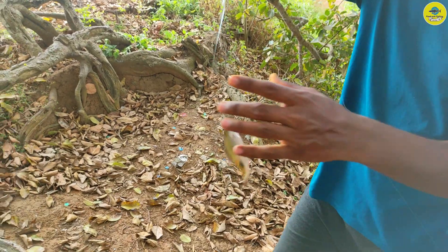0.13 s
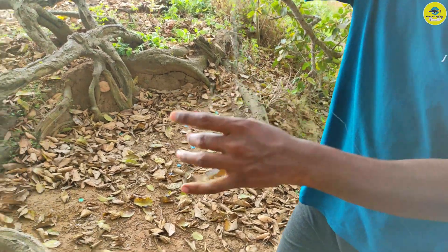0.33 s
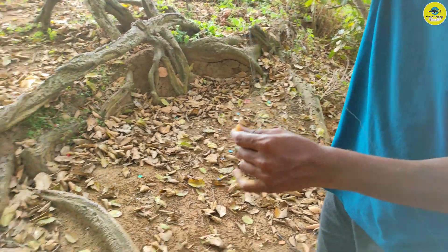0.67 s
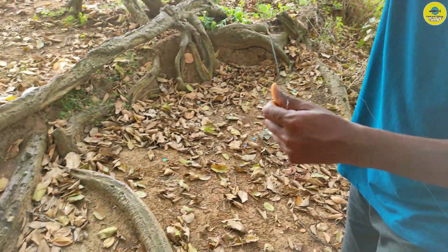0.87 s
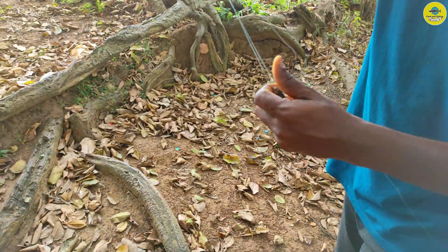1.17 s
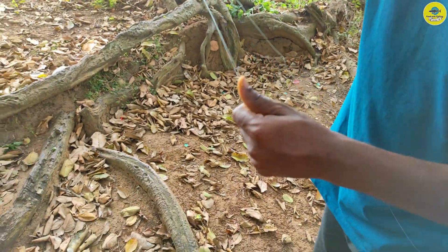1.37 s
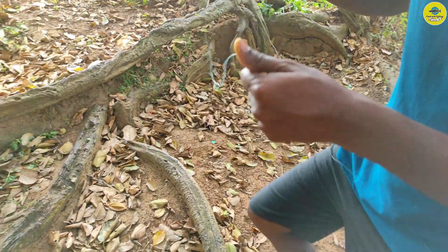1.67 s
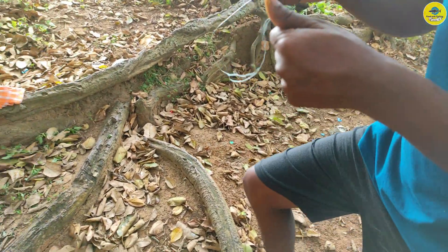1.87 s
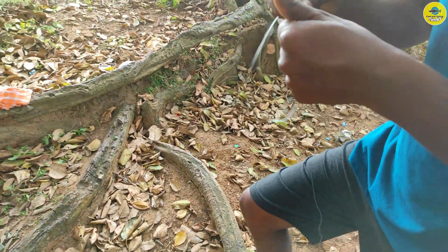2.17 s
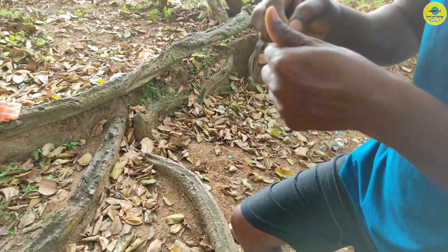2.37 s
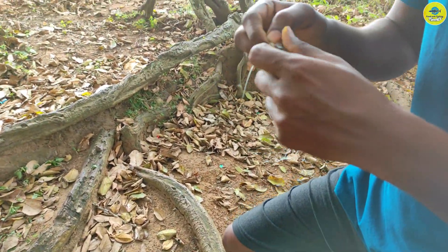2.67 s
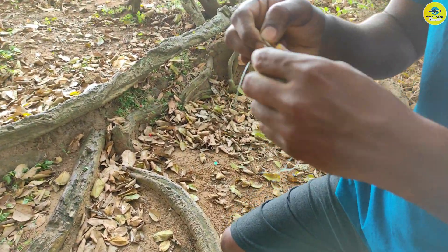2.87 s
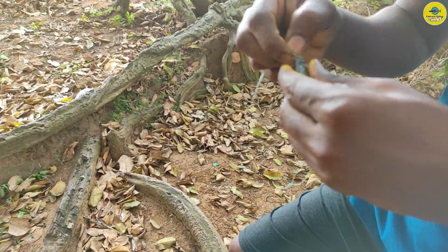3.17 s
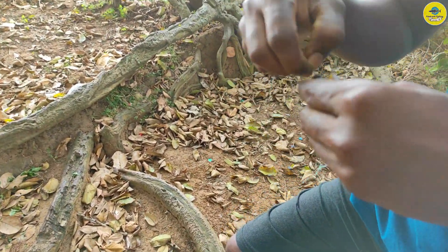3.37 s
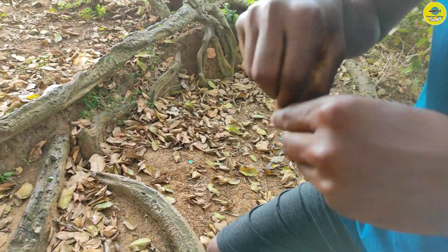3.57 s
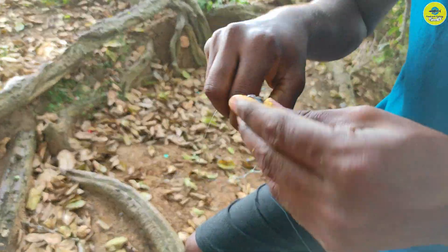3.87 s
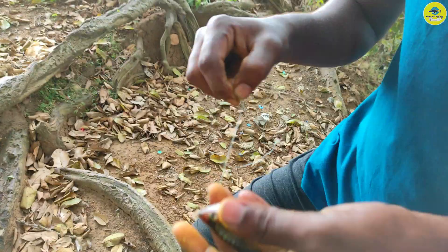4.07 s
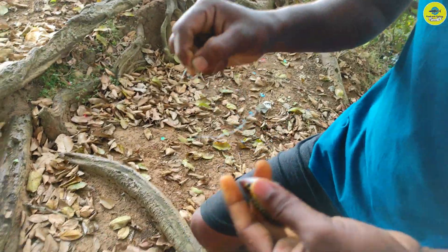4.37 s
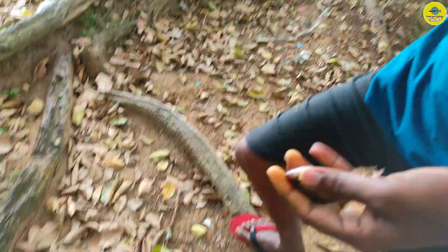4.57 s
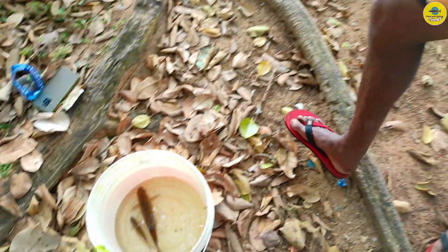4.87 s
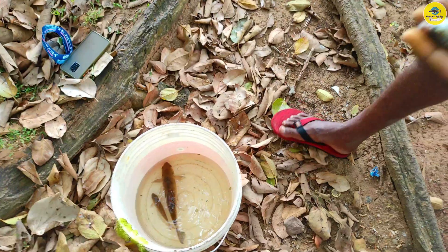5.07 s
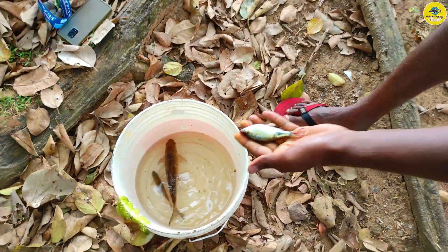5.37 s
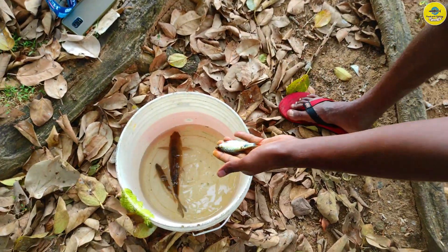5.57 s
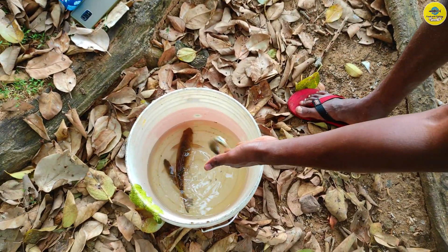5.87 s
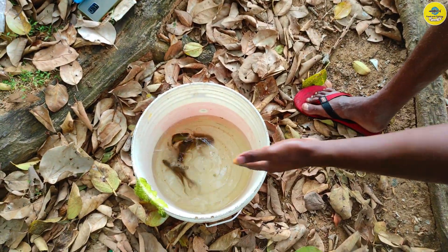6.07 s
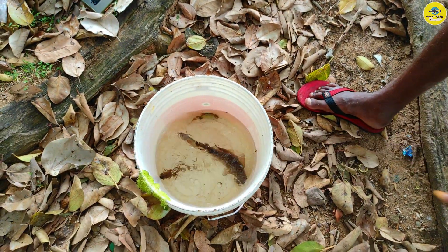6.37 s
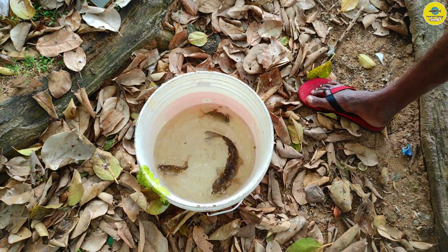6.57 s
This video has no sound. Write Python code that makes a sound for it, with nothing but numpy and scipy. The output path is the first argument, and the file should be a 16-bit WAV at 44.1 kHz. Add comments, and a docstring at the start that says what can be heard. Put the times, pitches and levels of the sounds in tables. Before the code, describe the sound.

Outdoors by a river, a person in sandals shifts about on dry leaves, heard close in stereo with a very short, faint echo off trunks and roots. It opens with rustling, brittle snaps and a cluster of twig cracks over the first half second, including a sharp snap at 0.5 s, then eases. A crunching step lands at about 1.1 s; heavier ones with dull thuds follow at 1.9 and 2.6 s, with lighter crackles between. Around 3.4 s comes a softer shuffle with cracks, then crisp crushes at 3.9 and 4.1 s. After a lull, another crunch at 5.0 s breaks into busy ticking and rustling that thins out. From about 6.1 s a small fish plops into a bucket: quick rising bubbles, light churning and spattering drops until the end, near 6.7 s. Faint hiss, a low distant river and soft wind continue throughout.

```python
"""By a river, someone in sandals shifts about on dry leaves, dragging up rustle made of crackling noise.
Noise snaps, twig cracks of falling tones and sole thuds of damped modes come from the start; sudden
crushing bursts of rustle from about 1 s. At about 6.1 s a small fish drops into a bucket: gliding bubble
tones over a churn of smaller ones. Throughout, far river, wind and a faint hiss lie behind as coloured noise.
A small stereo microphone hears the near sounds with a short diffuse echo off trunks and roots."""
import sys
import numpy as np
from scipy import signal
from scipy.fft import rfft, irfft, next_fast_len
from scipy.io import wavfile
from scipy.ndimage import uniform_filter1d, map_coordinates

SR = 44100
rng = np.random.default_rng(int(sys.argv[2]) if len(sys.argv) > 2 else 0)


def generate_wav(signal):
    """Clip the signal to [-1, 1] and save it as 16-bit WAV at the path in sys.argv[1]."""
    frames = np.transpose(np.atleast_2d(signal))
    scaled = np.clip(frames, -1, 1) * 32767
    pcm = np.round(scaled).astype(np.int16)
    wavfile.write(sys.argv[1], SR, pcm)


def volts(x):
    """Linear amplitude factor 10**(x/20) for a level x in dB, scalar or array-like."""
    e = np.asarray(x, float) / 20
    return 10 ** e


N = 296793


def leaves():
    """Rustle is dense crackle in a crisp and a coarse colour; snaps are bursts of both that stop fast."""
    # the clearest leaves breaking and, with the splash, drops spattering:
    # t/s, level/dB, coarse relative to crisp/dB, time scale/ms, left-right/dB
    clear_snaps = [(0.059, -24, -3, 3.2, -6), (0.2457, -18.5, -7, 6.2, 17.5), (0.4811, -25, -7, 1.83, 2.5),
                   (0.523, -6.5, -23.5, 1.52, 7.5), (0.612, -26.5, -15, 2.24, 0), (0.630, -23, -19, 1, 3.5),
                   (0.665, -29, -18, 1.13, 0.5), (0.823, -25, -9, 1.76, -0.5), (0.889, -25, -10, 5.75, 0.5),
                   (0.92, -21, -13, 1.2, 0), (0.967, -29, -17, 1.18, 2.5), (1.041, -19.5, -19, 1.37, 4.5),
                   (1.0658, -13, -21.5, 3.4, 17.5), (1.0785, -10.5, -18.5, 2.6, 14),
                   (1.1481, -15.5, -4, 1.75, -3), (1.2924, -24.5, -0.5, 1.48, -9.5),
                   (1.394, -21, -21.5, 1.42, -12), (1.5936, -31, -14, 1.2, 0), (1.7054, -29, -12, 1.5, 0),
                   (1.7266, -28.5, -5.5, 3.5, 3), (1.7806, -17.5, -11.5, 1.08, -8),
                   (1.8084, -16.5, -15.5, 1.41, 3.5), (1.861, -14, -13.5, 3.5, 6.5),
                   (1.8676, -8, -15.5, 8.15, 7.5), (2.239, -25.5, -20, 2.27, 4), (2.41, -20, -15, 2.5, -2),
                   (2.447, -21.5, -9.5, 1.95, -3.5), (2.461, -16.5, -5.5, 2.85, -1.5),
                   (2.4815, -17, -27, 2, -4), (2.515, -20, -14, 1, 0), (2.575, -25, -14, 1, 0),
                   (2.719, -14, -14, 1.5, 0), (2.874, -27, -14, 1.2, 0), (2.5337, -19, -3.5, 1.19, -9.5),
                   (2.621, -8.5, -27, 11.1, 6.5), (3.134, -18.5, -13.5, 2, -6.5),
                   (3.302, -21.5, -15, 1.4, -4), (3.432, -17.5, -14.5, 1.13, -4.5),
                   (3.451, -21.5, -20.5, 2.3, -5), (3.588, -26, -14, 1.2, 0), (3.632, -26, -8, 1.2, 0),
                   (3.6596, -16, -11, 0.79, 7.5), (3.735, -23, -21.5, 1.7, 2.5), (3.802, -26, -12, 1.2, 0),
                   (4.054, -27, -14, 1.2, 0), (4.021, -23.5, -10, 2.87, -13.5), (4.128, -6.5, -23, 4.7, 12),
                   (4.1455, -9, -20, 2.5, 12), (4.758, -21.5, -13.5, 1.04, 4),
                   (4.8447, -24.5, -14, 1.8, -10), (4.993, -22.5, -3, 2.15, 2.5),
                   (5.0089, -8, -12.5, 3.73, 3), (5.079, -8, -20, 1.17, -8.5), (5.1367, -16, -12, 1.5, -5),
                   (5.205, -22.5, -8, 1.05, 2.5), (5.318, -18.5, -21.5, 0.73, 5.5),
                   (5.484, -18, -20.5, 1.37, 5), (5.2654, -20, -13, 3.8, 2), (5.322, -25.5, -6, 2.2, 5.5),
                   (5.3376, -18, 5.5, 0.596, 4.5), (5.3622, -13, -10.5, 1.64, 3.5),
                   (5.389, -12, -6, 1.48, 6.5), (5.422, -14.5, -12, 0.97, -0.5),
                   (5.4691, -15, -32.5, 1.72, 7), (5.52, -25, -4, 3.1, 2), (5.5424, -25, -14, 1.5, 5),
                   (5.698, -27, -16, 1.2, 5), (5.705, -27, -14, 1.5, 5), (5.6134, -17.5, -15, 1.54, 13.5),
                   (5.6253, -12, -16.5, 1.79, 8.5), (5.647, -19, -14.5, 0.72, 16),
                   (5.741, -13, -18, 1.23, 5.5), (5.7604, -24, -8, 2, 5), (5.7883, -22, -16, 1, 5),
                   (5.802, -23, -16, 1.5, 3), (5.857, -28, -14, 1.2, 5), (5.8941, -27, -16, 1.2, 5),
                   (5.9754, -29, -14, 1.2, 5), (5.8426, -21, -17.5, 1.17, -2),
                   (5.9512, -17.5, -23, 1.85, 10.5), (6.057, -13, -24, 4.73, 9),
                   (6.0807, -6, -28.5, 0.99, 11.5), (6.1189, -24.5, -7, 2.38, -3.5),
                   (6.1367, -8.5, -16, 2.2, 11), (6.1486, -18.5, -16.5, 4.1, 0.5),
                   (6.2098, -8.5, -14, 1.48, -0.5), (6.257, -21, -3, 1.56, 9), (6.2804, -17, -9, 2.65, 3.5),
                   (6.3149, -19.5, -17.5, 2.2, 7), (6.4532, -21.5, -17, 2.5, 11), (6.1934, -22, -14, 2, 4),
                   (6.226, -24, -16, 1.2, 4), (6.387, -26, -16, 2.5, 4), (6.4199, -24, -14, 1.2, 4),
                   (6.505, -27, -20, 1, 4), (6.5526, -28, -16, 1.5, 4), (6.5795, -29, -18, 1.2, 4),
                   (6.61, -25, -18, 1.2, 4), (6.629, -27, -18, 1.2, 4), (6.465, -19.5, -18.5, 3.08, 4.5),
                   (6.5148, -7, -23.5, 1.3, 1.5)]
    # colour of the crisp rustle: f/Hz, level per Hz/dB
    crisp_colour = [(2500, -36), (4200, -17), (5900, -15), (6700, -8), (7500, 0), (9000, -1), (9700, -13.5),
                    (11000, -18), (14500, -31), (16200, -43)]
    # colour of the coarse crunch: f/Hz, level per Hz/dB
    coarse_colour = [(250, -19), (700, -15.5), (950, -6), (1900, -6), (2600, -4), (3400, -5.5),
                     (4600, -6.5), (6000, -8.5), (9000, -47.5)]
    rustle_pan_db = 1.5  # left-right

    crisp_gain, coarse_gain = stirring()
    flutter = volts(0.73 * wobble(40)) * sides(rustle_pan_db + 1.4 * wobble(2.981))
    crisp = crackle(count=9000, spread_db=7.0, life_s=0.00086, smooth=0.95, alike=0.0105)
    crisp = patchy(crisp, depth_db=2.5) * flutter * crisp_gain
    coarse = crackle(count=2200, spread_db=5.5, life_s=0.00222, smooth=0.95, alike=0.25)
    coarse = patchy(coarse, depth_db=3.0) * flutter * coarse_gain * volts(1.085 * wobble(25))

    t = np.arange(SR // 20) / SR
    for s, db, coarse_db, ms, pan_db in clear_snaps + small_snaps(count=12):
        u = 1000 * t / abs(ms)
        shape = volts(db - 2.0 - 5.82 * u ** 1.566) * (1 - np.exp(-u / 0.2175))
        start = abs(s - .0007)
        add(crisp, start, burst(shape, pan_db) * sides(pan_db)[:, None])
        add(coarse, start, volts(coarse_db) * burst(shape, pan_db) * sides(pan_db / 2)[:, None])
    crisp = coloured(crisp, lambda hz: along(crisp_colour, hz))
    return crisp + coloured(coarse, lambda hz: along(coarse_colour, hz))


def stirring():
    """Crisp and coarse gain of leaves that never quite settle: crushes and shuffles add their power."""
    # sudden crushing bursts, a foot on the leaves and, from 6.06 s, the splash:
    # t/s, crisp level/dB, coarse level/dB, time to fall 20 dB/s
    crush_rows = [(1.07, -18.5, -30, 0.1087), (1.863, -21, -30.5, 0.1966), (2.626, -17.5, -33.5, 0.1059),
                  (2.677, -18, -24.5, 0.1509), (4.134, -15, -32.5, 0.1124), (5.004, -17, -28.5, 0.0948),
                  (6.068, -31, -48.5, 0.0972), (6.146, -29.5, -37, 0.16), (6.204, -27.5, -34.5, 0.0749)]
    # a foot drags through, swelling and fading; the sign of the last column is ignored:
    # t of the peak/s, crisp level/dB, coarse level/dB, crisp time to fall 20 dB/s
    shuffle_rows = [(0.0, -28.5, -26, 0.1), (0.181, -27.5, -38, 0.3474), (0.306, -20.5, -23.5, 0.123),
                    (.46, -37.5, -47, 0.35), (0.732, -38.5, -43.5, 0.0962), (0.79, -34.5, -40.5, 0.1),
                    (0.923, -30, -37.5, 0.0664), (1.041, -30.5, -46, .04), (1.11, -19.5, -26, 0.06),
                    (1.145, -19.5, -21.5, 0.0434), (1.206, -30.5, -29.5, 0.01), (1.296, -35, -41.5, .35),
                    (1.821, -41.5, -44, -0.745), (1.979, -33, -32, 0.02), (2.128, -35, -31.5, -0.03),
                    (2.191, -30, -32, -0.0159), (2.307, -39, -42.5, 0.07), (2.387, -26, -45.5, -0.03),
                    (2.462, -28.5, -30.5, 0.16), (2.56, -33.5, -38.5, 0.03), (2.656, -24, -31, 0.0715),
                    (2.714, -30, -28, .08), (2.9, -42, -45.5, 1.5), (3.409, -27.5, -30.5, 0.1827),
                    (3.459, -34.5, -34, 0.1629), (3.84, -26, -35, -0.0074), (3.889, -16, -25, 0.0643),
                    (4.013, -31.5, -43, -0.18), (4.45, -36, -54, .5), (4.689, -36.5, -47, 0.23),
                    (4.789, -35.5, -42, 0.1172), (5.033, -25, -30, 0.0483), (5.051, -20, -23.5, 0.0724),
                    (5.135, -22.5, -31, 0.0408), (5.265, -30.5, -33, 0.1682), (5.308, -32, -43.5, 0.15),
                    (5.419, -29.5, -36.5, 0.2654), (5.486, -41, -56.5, 0.23), (5.621, -38.5, -43, 0.2),
                    (5.789, -40, -46, 0.1268), (5.917, -39.5, -47.5, 0.1453), (6.29, -47, -45, 0.17),
                    (6.37, -36.5, -45.5, -0.02), (6.45, -42.5, -47.5, 0.04), (6.57, -39.5, -46.5, 0.06),
                    (6.65, -40, -66.5, -0.05)]
    settle_crisp_db, settle_coarse_db = -47, -60
    crush_rise_s = 0.0061  # to climb 20 dB
    tail_db, tail_longer = -19.5, 2.88  # a softer and longer tail, as leaves spring back
    rise_over_fall = 1.062
    steepness = np.array([[1], [1.183]])  # the coarse crunch swells and fades faster

    power = np.ones(N) * volts([[settle_crisp_db], [settle_coarse_db]]) ** 2
    for s, crisp_db, coarse_db, fall_s in crush_rows:
        crush = peak(s, crush_rise_s, fall_s)
        tail = volts(2 * tail_db) * peak(s, crush_rise_s, tail_longer * fall_s)
        power = power + volts([[crisp_db], [coarse_db]]) ** 2 * (crush + tail)
    for s, crisp_db, coarse_db, fall_s in shuffle_rows:
        drag = peak(s, rise_over_fall * fall_s, fall_s) ** steepness
        power = power + volts([[crisp_db], [coarse_db]]) ** 2 * drag
    return np.sqrt(power)


def peak(s, rise_s, fall_s):
    """Power that climbs 20 dB in rise_s to time s and sinks 20 dB in fall_s."""
    t = np.arange(N) / SR - s
    return volts(-40 * np.maximum(-t / abs(rise_s), t / abs(fall_s)))


def crackle(count, spread_db, life_s, smooth, alike):
    """Tiny breaks of very uneven size, each a short puff of white noise, over a smooth share of rubbing."""
    at, size = rng.random((2, count))
    kicks = np.bincount((at * N).astype(int), volts(-2 * spread_db * np.log(size + .05)), N)
    puffs = signal.lfilter([1], [1, -np.exp(-1 / (life_s * SR))], kicks)
    power = puffs / puffs.mean() + smooth
    return np.sqrt(power) * noise([(1000, 0)], alike)


def patchy(x, depth_db):
    """Different leaves sound at different moments: patches of random gain in time and pitch."""
    z = signal.stft(x, nperseg=256)[2]
    field = rng.standard_normal(z.shape[1:])
    field = uniform_filter1d(field, size=5, axis=0)
    field = uniform_filter1d(field, size=7, axis=1)
    return unit(signal.istft(z * volts(depth_db * unit(field)), nperseg=256)[1][:, :N])


def small_snaps(count):
    """Faint snaps at random times, as rows like the clear ones."""
    when, draws = rng.random(count) * N / SR, rng.standard_normal((count, 4))
    return [(s, -32.5 + 0.5 * a, -17.5 + 3 * b, 2.04 * 1.74 ** c, 4 * d)
            for s, (a, b, c, d) in zip(when, draws)]


def burst(shape, pan_db):
    """Noise under a shape, of set energy; it reaches the two ports up to a few samples apart, the quieter first."""
    puff = shape * rng.standard_normal(len(shape))
    puff = puff * np.linalg.norm(shape) / np.linalg.norm(puff)
    lag = int(np.clip(-round(pan_db / 3), -12, 12))  # samples
    return np.array([np.pad(puff, (12, 12)), np.pad(puff, (12 + lag, 12 - lag))])


def twigs():
    """A twig or stalk cracks as a ragged tone that drops in pitch as it dies."""
    # duller cracks: t/s, level/dB, reference f/Hz (the tone glides from 1.32 towards 0.59 of it)
    crack_rows = [(0.216, -23, 2400), (0.2552, -13.5, 2248), (0.2788, -16, 2510), (0.3115, -11.5, 2770),
                  (0.396, -20, 3806), (0.4601, -24.5, 2370), (0.705, -31, 1590), (0.723, -31, 1820),
                  (0.782, -28.5, 1740), (1.295, -19.5, 4504), (1.1377, -13.5, 2478), (1.2062, -21.5, 2672),
                  (1.9324, -21, 1560), (2.0084, -12, 1111), (2.193, -24, 2340), (2.498, -15, 3634),
                  (3.4145, -18.5, 2897), (3.43, -18.5, 1684), (3.458, -12.5, 1696), (3.471, -22.5, 1508),
                  (5.0095, -17, 2860), (5.2569, -25, 1233), (5.336, -20.5, 1840), (5.362, -15, 2893),
                  (5.4918, -17.5, 1285)]
    t60_s = 0.015
    out, t = np.zeros((2, N)), np.arange(SR // 20) / SR
    for s, db, hz in crack_rows:
        gliding_hz = hz * (0.586 + 0.7308 * np.exp(-4 * t / t60_s))
        phase = 2 * np.pi * np.cumsum(gliding_hz) / SR
        ragged = 1 + 0.53 * unit(uniform_filter1d(rng.standard_normal(len(t)), size=12))
        crack = volts(db - 4.0 - 60 * t / t60_s) * ragged * np.sin(phase)
        add(out, s, np.tile(crack, (2, 1)))
    return coloured(out, lambda hz: along([(200, -24), (700, 0)], hz))


def steps():
    """The sole slaps with its own modes, unevenly; the ground's deep thud swells later and lasts longer."""
    # soles landing: t/s, level/dB, t60 of the slap/s, deep part relative/dB, hardness/dB per octave
    landings = [(.29, -28, 0.064, -21, 13), (.759, -37.5, 0.065, -14, 6), (.936, -35.5, 0.028, -8.5, -6),
                (1.066, -19, 0.075, -7, 0), (1.09, -26.5, 0.074, 6.5, 1.5),
                (1.870, -11.5, 0.0499, -13.5, 4), (1.899, -23.5, 0.0532, 2.5, -3),
                (2.010, -17.5, 0.0353, -15.5, -5.5), (2.630, -12.5, 0.0732, -8.5, -1.5),
                (2.641, -18.5, 0.0402, -36, -8.5), (2.658, -34, .06, 8, 0), (2.674, -26.5, 0.167, -7.5, 4),
                (3.459, -33, 0.0424, 6, 5.5), (4.132, -22, 0.0423, -9, 1), (5.01, -52, 0.116, -25, -16.5)]
    # modes of the sole: f/Hz, level/dB
    sole_modes = [(228, -3), (345, -2), (505, -3.5), (640, -1.5), (730, -2.5), (1000, -12)]
    # modes of the hollow ground: f/Hz, level/dB
    ground_modes = [(105, -24.5), (142, -0.5), (228, -4.5)]
    out, t = np.zeros((2, N)), np.arange(SR // 3) / SR

    def ring(modes, tilt):
        """Sum of sine modes, tilted in dB per octave about 500 Hz, a little different at each landing."""
        total = 0
        for hz, db in modes:
            gain = volts(db + tilt * np.log2(hz / 500) + rng.normal(0, 1.07))
            total = total + gain * np.sin(2 * np.pi * hz * rng.normal(1, 0.0292) * t)
        return total

    for s, db, t60, deep_db, hard_db in landings:
        ragged = 1 + 0.373 * unit(uniform_filter1d(rng.standard_normal(len(t)), size=90))
        slap = volts(-60 * t / t60) * (1 - np.exp(-t / 0.00286)) * ring(sole_modes, hard_db) * ragged
        thud_fall = volts(deep_db - 60 * t / (1.86 * t60))
        thud = thud_fall * (1 - np.exp(-t / 0.00584)) * ring(ground_modes, 0)
        add(out, s, np.tile(volts(db - 2.0) * (slap + thud), (2, 1)))
    return out


def splash():
    """The fish drops into the bucket: single clear bubbles over a churn of many small ones."""
    # clear single bubbles: t/s, level/dB, start f/Hz, pitch rise/octaves per s
    clear_bubbles = [(6.121, -34.5, 3370, -3), (6.138, -20.5, 1166, 39), (6.14, -31, 397, 4.5),
                     (6.162, -21.5, 1546, 11.5), (6.172, -29.5, 1174, 8.5), (6.19, -30.5, 1126, -2),
                     (6.198, -24.5, 390.5, 14), (6.209, -22, 4324, 14), (6.21, -29, 2245, 8.5),
                     (6.125, -34.5, 2190, -1), (6.198, -30, 3330, 4), (6.215, -34.5, 1052, 5),
                     (6.236, -37, 1257, 4.5), (6.268, -34.5, 896, 0.5), (6.253, -26, 3980, 7),
                     (6.271, -29.5, 1562, 26.5), (6.279, -23, 2030, 15.5), (6.287, -26.5, 2925, 11.5),
                     (6.288, -24, 3803, 4), (6.29, -23.5, 2247, 15), (6.311, -28, 2340, 13),
                     (6.319, -33.5, 853, -0.5), (6.343, -39, 2267, 2.5), (6.335, -37.5, 842, -0.5),
                     (6.361, -43.5, 1263, 7), (6.381, -39.5, 888, 5.5), (6.388, -39, 824, 2.5),
                     (6.388, -40, 2200, 5), (6.4, -30.5, 1490, 22.5), (6.4, -36.5, 445, 40.5),
                     (6.428, -38, 898, 21.5), (6.428, -36, 4190, -0.5), (6.44, -39.5, 2280, 3.5),
                     (6.446, -34, 863, 6.5), (6.473, -41, 3690, -1), (6.441, -30.5, 1250, -9),
                     (6.487, -38.5, 1400, 6.5), (6.505, -40, 1657, 5), (6.533, -37.5, 915, 31),
                     (6.59, -36, 4536, 4), (6.515, -26.5, 4670, 16), (6.518, -35.5, 2372, 2),
                     (6.52, -37.5, 919, -7), (6.545, -28, 1503, 24.5), (6.552, -33.5, 1886, 12.5),
                     (6.561, -35, 2200, 13)]
    # churning of the water: t/s, relative level/dB
    churn_rows = [(6.04, -50), (6.12, -55), (6.14, -45), (6.22, -37), (6.3, -41), (6.36, -43.5),
                  (6.45, -44), (6.56, -44), (6.639, -57)]
    out, swarm, t = np.zeros((2, N)), np.zeros((2, N)), np.arange(SR // 8) / SR
    for s, db, hz, rise in clear_bubbles:
        length = 0.00807 * (1000 / hz) ** 0.387  # s; higher bubbles are shorter
        add(out, s, bubble(t, hz, length, rise) * volts(db) * sides(rng.normal(0, 2))[:, None])
    start, end = churn_rows[0][0], churn_rows[-1][0]
    for when, pitch, size, pan in rng.random((240, 4)):
        hz = 650 * 2 ** (2.1 * pitch)
        small = bubble(t, hz, 14 / hz, 13.36) * volts(-14 * size) * sides(8 * pan - 4)[:, None]
        add(swarm, start + when * (end - start), small)
    swarm /= np.sqrt(np.sum(swarm ** 2) / (2 * SR * (end - start)))  # rms 1 while it churns
    return out + volts(curves(churn_rows)[0] - 7.5) * swarm


def bubble(t, hz, length, rise):
    """A bubble near the surface rings briefly with a gliding pitch, 10 dB down after length seconds."""
    phase = 2 * np.pi * np.cumsum(hz * 2 ** np.clip(rise * t, -1, 1)) / SR
    u = t / length
    return volts(-10 * u ** 1.165) * (1 - np.exp(-u / 0.121)) * np.sin(phase)


def trees(x):
    """A short diffuse answer off trunks and roots, each frequency dying at its own speed."""
    # decay of the echo: f/Hz, t60/s
    echo_decay = [(300, 0.275), (3000, 0.209), (10000, 0.023)]
    hz, t, z = signal.stft(rng.standard_normal((2, SR // 3)), SR, nperseg=256)
    fall = volts(-60 * t / along(echo_decay, hz)[:, None])
    tail = signal.istft(z * fall, SR, nperseg=256)[1]
    tail = tail / np.linalg.norm(tail[0])
    delayed = np.pad(x, ((0, 0), (200, 0)))  # samples
    return signal.fftconvolve(delayed, tail, axes=1)[:, :N]


def air():
    """Coloured noises: hiss that breathes a little, the slowly fading far river, lumpy wind on the ports."""
    # colour of the hiss: f/Hz, level per Hz/dB
    hiss_colour = [(290, -52.5), (500, 6.5), (1400, -3), (3060, -28), (4150, -15.5), (5240, -64),
                   (7420, 23.5), (8830, -14.5), (10100, -84), (15300, -30.5), (16000, -69)]
    # colour of the river: f/Hz, level per Hz/dB
    river_colour = [(60, -5.5), (110, -3), (190, 1.5), (350, -3.5), (650, -11), (1200, -30)]
    # colour of the wind: f/Hz, level per Hz/dB
    wind_colour = [(10, -5), (25, -4.5), (50, -11), (90, -17.5), (160, -56)]
    # strength of the wind: t/s, level/dB
    gust_rows = [(0.0, -51), (0.47, -53.5), (0.88, -49.5), (1.2, -53), (3.6, -51.5), (4.16, -54.5),
                 (5.49, -54), (6.09, -41.5), (6.22, -50.5), (6.73, -49.5)]
    river_db = -49.5 - 0.5976 * np.arange(N) / SR  # fades in dB per s
    hiss = volts(-54.5 + wobble(4.49)) * noise(hiss_colour, alike=0.045)
    river = volts(river_db + 0.39 * wobble(23)) * noise(river_colour, alike=0.616)
    wind = volts(curves(gust_rows)[0] + 2.21 * wobble(5.5)) * noise(wind_colour, alike=0.445)
    return hiss + river + wind


def noise(spectrum, alike):
    """Stereo noise of rms 1; alike is the correlation between the two sides."""
    m = next_fast_len(N)
    gain = volts(along(spectrum, np.fft.rfftfreq(m, 1 / SR)))
    a, b = irfft(rfft(rng.standard_normal((2, m))) * gain, m)[:, :N]
    turn = np.arccos(np.clip(alike, 0, 1)) / 2
    middle, side = np.cos(turn) * a, np.sin(turn) * b
    return unit(np.array([middle + side, middle - side]))


def coloured(x, gain_db):
    """x through a causal minimum-phase filter of unit energy, shaped by gain_db(Hz)."""
    size = 2048
    cepstrum = irfft(np.log(volts(gain_db(np.fft.rfftfreq(size, 1 / SR)))), size)
    cepstrum[1:size // 2] *= 2
    cepstrum[size // 2 + 1:] = 0
    response = irfft(np.exp(rfft(cepstrum)), size)
    return signal.fftconvolve(x, response[None] / np.linalg.norm(response), axes=1)[:, :N]


def unit(x):
    """Scaled to rms 1."""
    return x / np.sqrt(np.mean(x ** 2) + 1e-20)


def along(points, hz):
    """(Hz, value) points read on a log axis."""
    f, v = np.transpose(points)
    return np.interp(np.log(hz + 1), np.log(f + 1), v)


def curves(rows):
    """One value per sample for each column after the time."""
    s, *cols = np.transpose(rows)
    return [np.interp(np.arange(N) / SR, s, c) for c in cols]


def wobble(rate):
    """A smooth random curve, rate knots a second."""
    knots = rng.standard_normal(int(N * rate / SR) + 4)
    return map_coordinates(knots, [np.arange(N) * rate / SR])


def sides(pan_db):
    """Left and right gains of a left-right difference."""
    return volts(np.array([pan_db / 2, -pan_db / 2]))


def add(track, s, sound):
    """Mixes a stereo sound in at time s."""
    at = round(s * SR)
    track[:, at:at + sound.shape[1]] += sound[:, :N - at]


def scene():
    """Near sounds with their faint open-air echo, over the air."""
    near = leaves() + twigs() + steps() + splash()
    echo = volts(-15) * trees(near)
    return near + echo + air()


def top_cut(x):
    """Nothing passes above the cut-off."""
    return signal.sosfilt(signal.butter(12, 16450, fs=SR, output="sos"), x)


def record(dry):
    """Each microphone port has its own colour, loud peaks clip, then the top is cut."""
    # difference of the two ports: f/Hz, left-right/dB
    port_difference = [(100, 6), (600, 5.5), (1500, 1), (4500, -1), (6500, -10.5), (8500, 3), (13000, 1.5)]
    top_hz = 16400
    left = coloured(dry[:1], lambda hz: along(port_difference, hz) / 2)
    right = coloured(dry[1:], lambda hz: -along(port_difference, hz) / 2)
    clipped = np.clip(np.vstack([left, right]), -.8, .8)
    mix = coloured(clipped, lambda hz: np.where(hz < top_hz, 0, -90))
    return top_cut(mix)


dry = scene()
out = record(dry)
generate_wav(out)
```